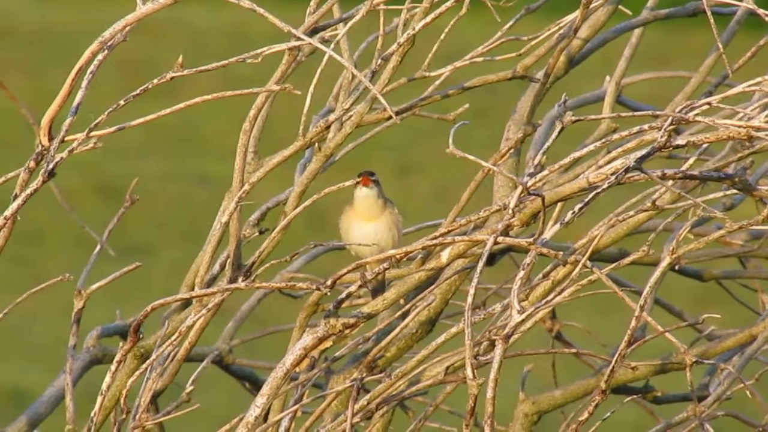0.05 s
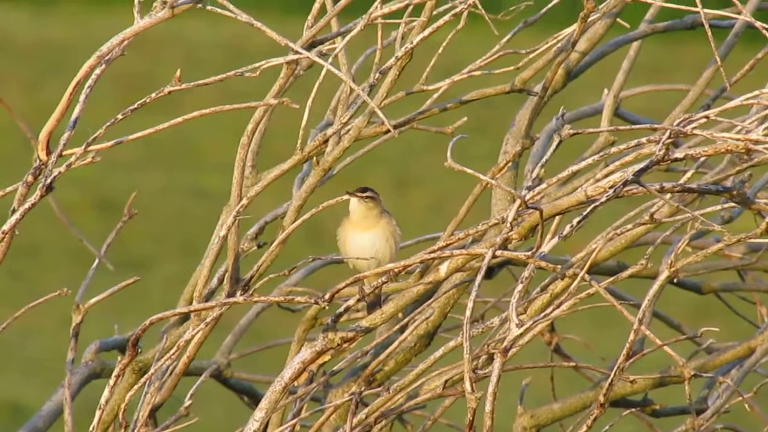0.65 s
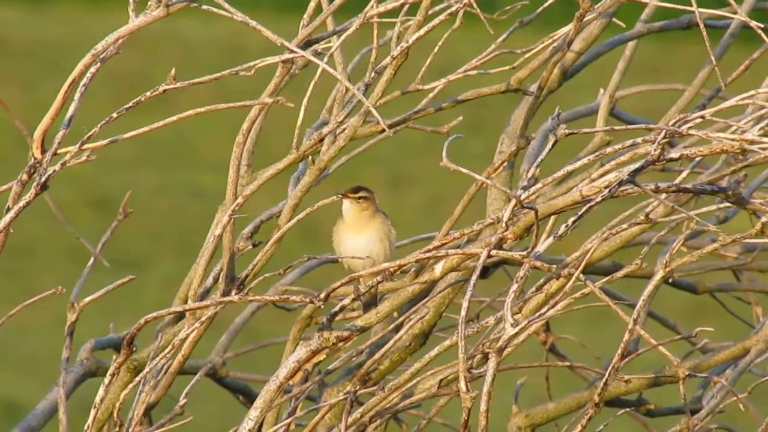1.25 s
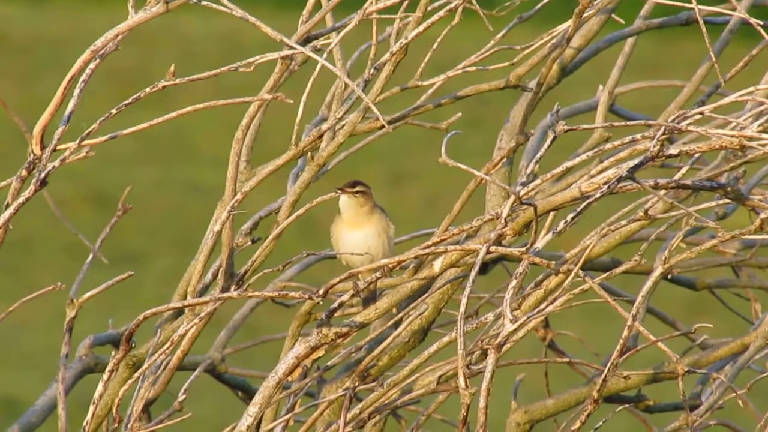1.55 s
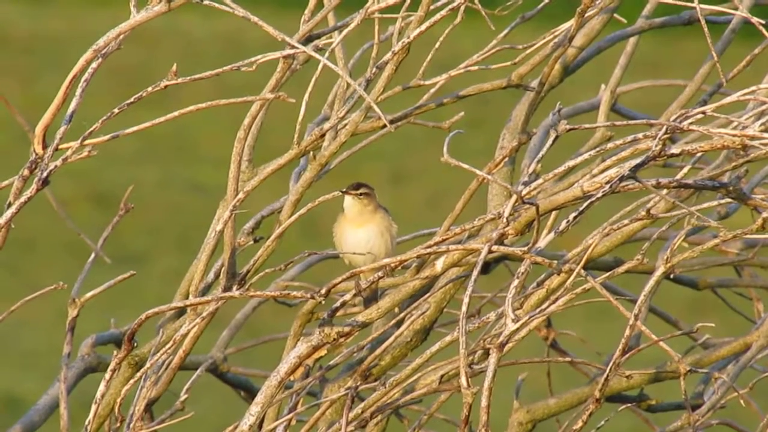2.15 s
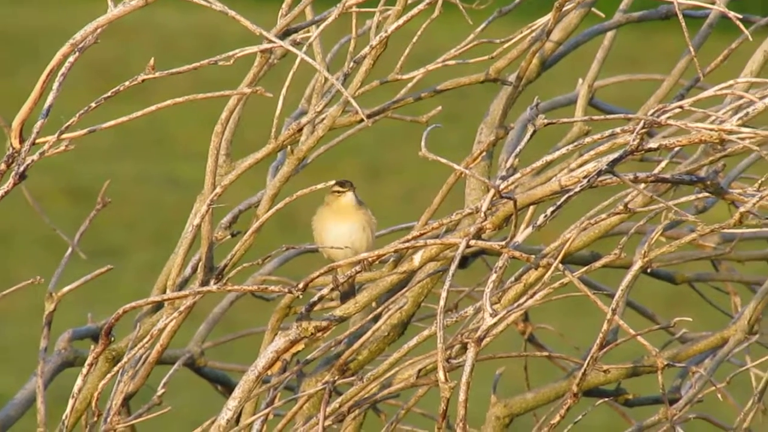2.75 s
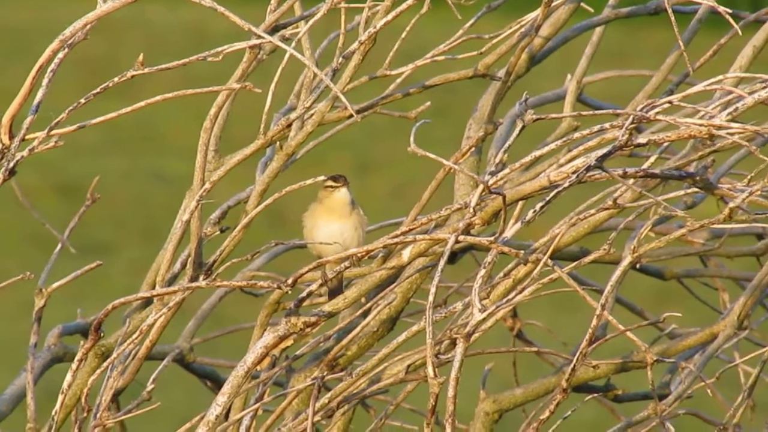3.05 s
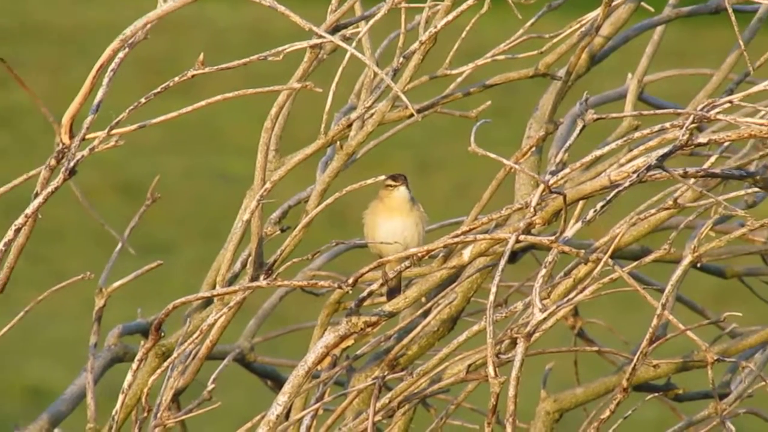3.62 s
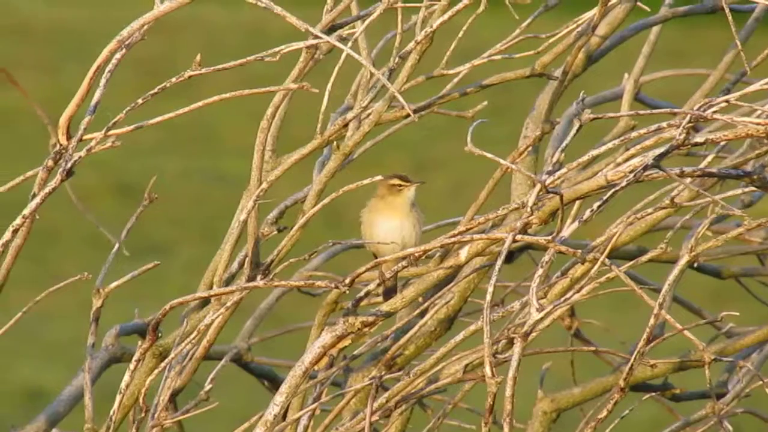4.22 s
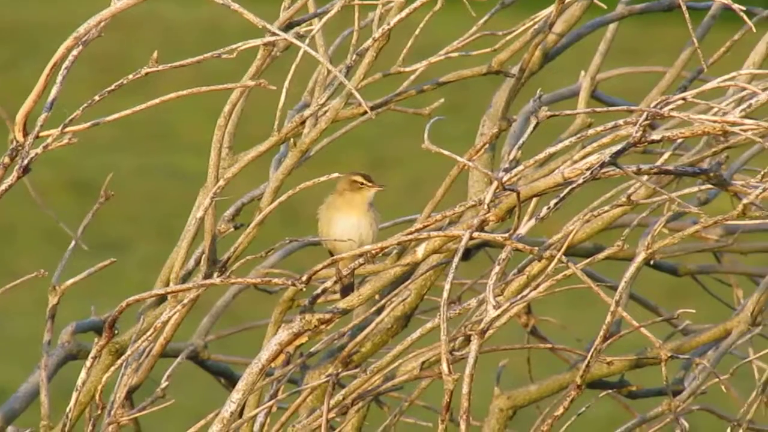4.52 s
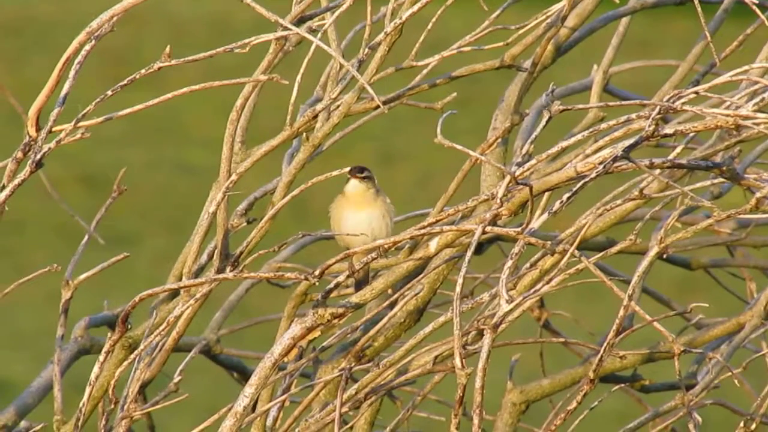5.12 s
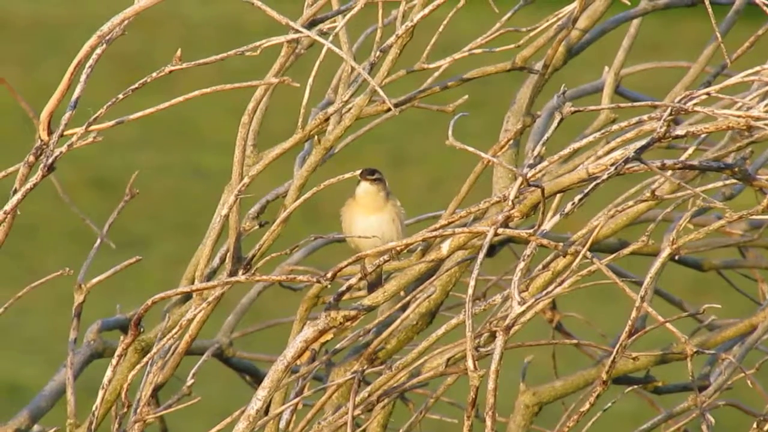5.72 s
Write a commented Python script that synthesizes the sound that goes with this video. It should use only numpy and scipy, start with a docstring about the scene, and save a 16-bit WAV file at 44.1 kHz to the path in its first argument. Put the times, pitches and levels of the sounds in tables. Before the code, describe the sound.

A nearby warbler sings rattling notes and high whistles outdoors, over gusty wind rumble and faint distant bird calls.

```python
"""A warbler chatters in dry branches, close in front of a stereo microphone. The membranes of its
syrinx pulse in harsh chips, are chopped by a slower vibration into nasal buzzes, or swing cleanly in
quick whistles, often two sounds at once from the two sides. Soft low whistles arch under its song.
Far off to the right a songbird slurs and rasps and something calls hoarsely. Over the hum of open
country, gusts push eddies against the microphone ports, mostly the right one."""
import sys
import numpy as np
from scipy import signal
from scipy.fft import rfft, irfft
from scipy.io import wavfile
from scipy.ndimage import uniform_filter1d

SR = 44100
rng = np.random.default_rng(int(sys.argv[2]) if len(sys.argv) > 2 else 0)


def dump_mix(stems):
    """Bounce the given channels to the path in sys.argv[1] as a 16-bit WAV at rate SR."""
    frames = np.atleast_2d(stems).T  # one column per channel
    limited = np.clip(frames, -1, 1)  # hard clip at full scale
    pcm = np.round(limited * 32767).astype(np.int16)
    wavfile.write(sys.argv[1], SR, pcm)


N = 258867
TIME = np.arange(N) / SR

# spectra of open air, wind rumble on a port and the breeze's slow pressure swings: f/Hz, level/dB
AIR_SPECTRUM = [(30, -29), (250, -9.5), (520, -3.5), (900, -10), (2000, -7), (3500, -14.5), (7000, -18),
                (15000, -32)]
RUMBLE_SPECTRUM = [(15, -16), (40, -6), (85, 0), (150, -5), (300, -15), (600, -37), (1500, -60)]
SWAY_SPECTRUM = [(15, -11), (35, 3), (60, -2), (120, -23), (400, -60)]
# breeze on the microphone between gusts: left level/dB, right level/dB
BREEZE_DB = (-61.5, -58)
# gusts on the microphone ports: t/s, length/s, left level/dB, right level/dB
GUSTS = [(0.123, 0.15, -70, -54.5), (0.858, 0.57, -56, -47), (1.8, 0.26, -62, -46.5),
         (2.184, .44, -39.5, -29), (2.755, 0.45, -54.5, -38), (3.286, 0.33, -36, -27.5),
         (3.873, 0.08, -49, -29), (4.495, 0.25, -52, -44), (4.775, 0.055, -37.5, -27.5),
         (4.976, .3, -41.5, -33.5), (5.317, 0.17, -36.5, -26.5), (5.523, .33, -27.5, -25)]
# single buffets on the right port: t/s, peak level/dB
BUFFETS = [(2.266, -14), (2.56, -20.5), (2.937, -28.5), (3.296, -16), (3.95, -23.5), (4.806, -20),
           (5.318, -16), (5.448, -12.5), (5.545, -11), (5.697, -14.5), (5.791, -8)]

# response of the warbler's throat: f/Hz, level/dB
THROAT = [(1200, -23.5), (2600, -4), (3600, -5.5), (4700, 2.5), (6400, 3.5), (7800, -2.5), (9500, -12),
          (12500, -20.5), (15500, -34)]
# rattles of three chips: t/s, spacing/s, f/Hz, brightness/(dB per octave), level/dB
RATTLES = [(.028, 0.02, 1582, 7.5, -29.5), (.125, .021, 1600, 8, -29), (2.937, 0.02, 1568, 4, -37),
           (3.038, .022, 1550, 1.5, -37), (3.146, .025, 1442, -1, -41), (3.758, .021, 1536, 5.5, -35.5),
           (3.859, 0.019, 1500, 1, -37.5), (4.63, 0.02, 1587, -0.5, -39.5), (4.761, 0.023, 1614, 1, -37.5),
           (4.879, .022, 1614, 5.5, -33.5), (5.002, .021, 1590, 11.5, -31.5), (5.137, .022, 1664, 5, -34),
           (5.284, .022, 1660, 4.5, -33.5), (5.402, .023, 1696, 2, -34), (5.516, .021, 1594, -2.5, -36),
           (5.626, .024, 1557, -1.5, -35)]
# hoarse calls in the distance: t/s, length/s, level/dB
CAWS = [(0.082, 0.58, -54), (1.651, 0.58, -58.5), (2.1, 0.61, -52.5), (3.155, 0.42, -60.5),
        (3.71, 0.39, -51), (4.333, 0.4, -49), (4.982, 0.57, -48.5)]
# slurs of the near warbler and the far songbird: t/s, length/s, first, middle and last f/Hz, level/dB
NEAR_SLURS = [(.18, .21, 7580, 7200, 6920, -47), (.55, 0.12, 7330, 7210, 6920, -45.5),
              (2.284, .04, 4720, 4770, 6100, -53.5), (2.516, 0.038, 4680, 4820, 5950, -56),
              (2.746, 0.038, 4610, 4780, 6000, -53), (3.555, 0.046, 5650, 6400, 5680, -59),
              (3.703, 0.049, 6430, 6150, 5900, -37.5), (4.67, 0.069, 6040, 5583, 6030, -25.5)]
FAR_SLURS = [(.8, 0.21, 2566, 2700, 2540, -50), (1.07, 0.22, 2227, 2460, 2345, -53),
             (4.18, .065, 3900, 3510, 3350, -58.5), (4.29, 0.03, 3590, 3260, 2850, -60.5),
             (4.41, 0.037, 3530, 3520, 3850, -58)]
# course of the arched syllable: t/s from its start, f/Hz, level/dB, rasp share 0-1
ARCH_SHAPE = [(0, 3900, -46, .3), (.009, 6750, -29, .1), (.022, 3200, -39.5, 1), (.042, 3150, -41, .9),
              (.052, 6190, -26.5, .05), (.064, 7950, -40.5, .1), (.083, 8750, -46, 0), (.093, 6570, -23, 0),
              (.1, 5430, -25.5, 0), (.111, 4720, -39, 0)]
# arched syllables: t/s, gain/dB, pitch factor, length factor, summit boost/dB
ARCHES = [(.219, -1.5, 1.035, 1, 2), (0.397, -2.5, 0.99, .99, 1.5), (.571, -2.5, 1.01, 1.003, 1.5),
          (3.274, -6, 1.03, 0.91, 11), (5.729, -6, 1.046, 1.02, 5)]
# pitch range over which the beak opens wide for that boost: low f/Hz, high f/Hz
SUMMIT_HZ = (7000, 8200)
# falling pips between phrases: t/s, length/s, f/Hz, share of pitch lost, level/dB
PIPS = [(0.768, .03, 5270, 0.24, -48.5), (1.606, .026, 4830, .12, -56), (2.694, 0.024, 4190, .07, -53.5),
        (3.804, 0.046, 4790, 0.24, -46), (3.908, 0.034, 5260, 0.064, -38),
        (4.121, 0.0216, 4760, 0.082, -39), (4.348, 0.031, 4680, 0.073, -32.5),
        (4.572, .032, 3870, 0.27, -43.5)]
# partials of the buzz, the nasal scold and the far rasp: multiple of the main line, level/dB
BUZZ_PARTIALS = [(.5, -15.5), (.7, -23), (.8, 1.5), (.9, -3), (1, 2.5), (1.1, -9), (1.2, -10.5), (1.3, -16),
                 (1.5, -21), (1.7, -31)]
NASAL_PARTIALS = [(.8, -8.5), (1, 0), (1.2, -8), (1.5, -9.5), (2, -14.5), (2.5, -39)]
RASP_PARTIALS = [(1, 3), (1.3, -8.5), (1.7, -5)]
# buzzes: t/s, length/s, top f/Hz, place of the top in the note 0-1, level/dB, tick count
BUZZES = [(0.786, .058, 7470, 0.58, -33, 1), (0.937, 0.086, 7205, 0.21, -30, 3),
          (1.145, .081, 7190, 0.033, -30.5, 2)]
# soft low arching whistles under the warbler's song: t/s, top f/Hz, level/dB
LOW_WHISTLES = [(0.806, 2940, -42.5), (.972, 2970, -45), (4.972, 2880, -50.5), (5.028, 2870, -48),
                (5.169, 2820, -52.5), (5.239, 2660, -48), (5.782, 2880, -51.5)]
# the warbler's scolding notes: t/s, length/s, top f/Hz, level/dB
SCOLDS = [(1.396, 0.045, 3340, -40), (1.437, 0.045, 2940, -41.5), (1.483, .05, 2726, -47.5)]
# the far songbird's hoarse notes: t/s, length/s, lowest f/Hz, level/dB
FAR_RASPS = [(2.58, 0.077, 2505, -57.5), (2.7, 0.05, 2490, -58.5), (2.818, 0.061, 2515, -56.5),
             (3.3, 0.079, 2470, -54), (3.44, 0.07, 2465, -52)]
# courses of the warbler's three learnt whistles: t/s from the start, f/Hz, level/dB
RISE_SHAPE = [(0, 4900, -39), (.007, 5170, -35), (.018, 5540, -26), (.032, 5890, -37.5),
              (.053, 7340, -42.5), (.095, 6570, -47), (.14, 6350, -35), (.153, 5910, -38.5)]
FALL_SHAPE = [(0, 4640, -39.5), (.008, 5350, -27), (.02, 6020, -41.5), (.042, 5390, -28), (.063, 4500, -28),
              (.075, 4080, -34.5), (.085, 3997, -50)]
THIN_SHAPE = [(0, 6780, -45), (.008, 7280, -32.5), (.018, 7610, -31), (.029, 7200, -27.5),
              (.041, 6890, -39), (.073, 7030, -29), (.107, 6970, -41), (.2, 6720, -31.5)]
# rising whistles: t/s, gain/dB, length factor
RISES = [(3.969, -1.3, .85), (4.174, -0.2, 1), (4.402, 3, .94)]


def amp(db):
    """Decibels to gain."""
    return 10 ** (np.asarray(db) / 20)


def unit(x):
    """Scales to rms 1."""
    return x / np.sqrt(np.mean(x ** 2) + 1e-20)


def gain_at(spectrum, hz):
    """Reads a spectrum on a log-frequency axis."""
    f, db = np.transpose(spectrum)
    return amp(np.interp(np.log(hz + 1), np.log(f), db))


def noise(spectrum, size):
    """Noise of rms 1 with the given spectrum."""
    gains = gain_at(spectrum, np.fft.rfftfreq(size, 1 / SR))
    return unit(irfft(rfft(rng.standard_normal(size)) * gains, size))


def waver(hz, size):
    """Smooth random motion of rms 1, up to about hz."""
    gains = np.exp(-(np.fft.rfftfreq(size, 1 / SR) / hz) ** 2)
    return unit(irfft(rfft(rng.standard_normal(size)) * gains, size))


def add(mix, s, sound):
    """Mixes a sound in at time s."""
    part = mix[max(round(s * SR), 0):][:len(sound)]
    part += sound[:len(part)]


def progress(length):
    """Runs from 0 to 1 over a note."""
    return np.linspace(0, 1, int(length * SR))


def swell(u, attack, release):
    """Rise, hold and fall; attack and release are shares of the note."""
    return np.sin(np.pi / 2 * np.clip(np.minimum(u / attack, (1 - u) / release), 0, 1)) ** 2


def faded(x, samples=60):
    """Softens both ends of a sound."""
    k = np.arange(len(x))
    return x * np.minimum(np.minimum(k, k[::-1]) / samples, 1)


def gesture(shape, stretch, inertia_samples=130):
    """Control curves of one note, their corners rounded by the inertia of the muscles."""
    s, *columns = np.transpose(shape)
    s = np.sort(s) * stretch
    t = np.arange(s[0], s[-1], 1 / SR)
    return [uniform_filter1d(np.interp(t, s, column), inertia_samples) for column in columns]


def phase_of(hz, jitter, jitter_hz):
    """Phase of a membrane whose pitch trembles."""
    return 2 * np.pi * np.cumsum(hz * (1 + jitter * waver(jitter_hz, len(hz)))) / SR


def air(hum_db=-56, width=0.83, rustle_db=-63):
    """The hum of open country all around, and a thin rustle of dry stalks in one gust."""
    centre = noise(AIR_SPECTRUM, N)
    sides = np.array([noise(AIR_SPECTRUM, N) for _ in range(2)])
    stalks = np.array([noise([(4000, -8.5), (8500, -15), (12000, -6), (15500, -25)], N)
                       for _ in range(2)])
    gust = np.exp(-((TIME - 3.35) / 0.76) ** 2)
    return amp(hum_db) * unit(centre + width * sides) + amp(rustle_db) * stalks * gust


def pressure_db(side, attack_s=0.022, release_s=0.063):
    """Wind pressure on one port: gusts that build, hold and ease off over a light breeze."""
    power = amp(BREEZE_DB[side]) ** 2
    for s, length, *ports_db in GUSTS:
        outside = np.maximum(s - TIME, 0) / attack_s + np.maximum(TIME - s - length, 0) / release_s
        power = power + (amp(ports_db[side]) * np.exp(-outside)) ** 2
    return 10 * np.log10(power)


def eddy(width_s):
    """An eddy passing the port sucks, then pushes."""
    u = np.arange(-5 * width_s, 5 * width_s, 1 / SR) / width_s
    return u * np.exp((1 - u ** 2) / 2)


def wind(full_gust_db=-26, growth=1.65, lumps_db=6, eddies_db=-0.5, flurry_db=5, narrow_db=-14,
         sway_db=-57, hits_per_s=90):
    """Each microphone port rumbles on its own; eddies knock on it, outgrowing the rumble in a gust."""
    out = np.zeros((2, N))
    for side, port in enumerate(out):
        db = pressure_db(side)
        port += amp(db) * unit(noise(RUMBLE_SPECTRUM, N) * amp(lumps_db * np.tanh(waver(31, N))))
        port += amp(sway_db) * noise(SWAY_SPECTRUM, N)
        knocks, flurry = np.zeros(N), np.tanh(waver(30, N))
        for smallness, width_s in zip(np.linspace(0, 1, 5), np.geomspace(.0013, .0003, 5)):
            hits = rng.standard_normal(N) * (rng.random(N) < hits_per_s / SR)
            gain = amp(narrow_db * smallness + flurry_db * flurry * (1 + smallness))
            knocks += gain * signal.oaconvolve(hits, eddy(width_s), "same")
        port += amp(eddies_db + full_gust_db + growth * (db - full_gust_db)) * unit(knocks)
    for s, db in BUFFETS:
        for k in range(3):  # each big eddy sheds weaker ones behind it
            lag_s = k * rng.uniform(.003, .008)
            add(out[1], s + lag_s, amp(db - 7 * k) * eddy(rng.uniform(.00033, .00065)))
    return out


def chip(length, pitch_hz, bright, sag, half_db=-9, hiss_db=-11):
    """Strong and weak pulses through the throat; the pitch arches, then sags as the pressure goes."""
    u = progress(length)
    hz = pitch_hz * (1 + .02 * rng.standard_normal()) * (1 - sag * (u - .3) ** 2)
    k = np.arange(2, 24)[:, None] / 2  # harmonics and the half lines between them
    throat = [(f, db + bright * np.log2(min(f, 8500) / 6000)) for f, db in THROAT]
    half_lines = np.where(k % 1 > 0, amp(half_db) * 2 * u, 1)  # the pulses grow uneven
    lines = gain_at(throat, k * hz) * half_lines * (k * hz < SR / 2)
    phase = phase_of(hz, jitter=.024, jitter_hz=800)
    voice = (lines * np.cos(k * phase + rng.uniform(0, np.pi, k.shape))).sum(0)
    hiss = amp(hiss_db) * noise(throat, len(u))
    return unit(unit(voice) + hiss) * np.abs(np.sin(np.pi * u)) ** 1.55


def rattles(dulling=1.8, first_db=-3, first_sag=0.28, later_sag=0.504):
    """The warbler's chips come in quick threes; the later ones are louder, duller and sag more."""
    out = np.zeros(N)
    for s, spacing, hz, bright, db in RATTLES:
        length = .88 * spacing
        for k, (gain_db, sag) in enumerate([(first_db, first_sag), (0, later_sag), (0, later_sag)]):
            note = chip(length, hz, bright - dulling * k, sag)
            add(out, s + k * spacing - length / 2, amp(db + gain_db) * note)
    return out


def caws(resonances_hz=(1430, 1860), width_hz=170, opening=.16):
    """A distant caller: hoarse noise in two throat resonances that rise as the beak opens."""
    out = np.zeros(N)
    for s, length, db in CAWS:
        u = progress(length)
        phase_per_hz = 2 * np.pi * np.cumsum(1 + opening * (u - .5)) / SR
        call = 0
        for hz in resonances_hz:
            band = waver(width_hz, len(u)) + 1j * waver(width_hz, len(u))
            call += (band * np.exp(1j * hz * phase_per_hz)).real
        add(out, s, amp(db) * unit(call) * np.sqrt(np.abs(np.sin(np.pi * u))))
    return out


def tone(hz, octave_db=-47):
    """A nearly pure whistle that trembles a little in pitch and level."""
    phase = phase_of(hz, jitter=.005, jitter_hz=400)
    flutter = amp(.7 * waver(120, len(hz)))
    return np.sqrt(2) * flutter * (np.sin(phase) + amp(octave_db) * np.sin(2 * phase))


def slurs(notes, attack, release):
    """Whistles that bend smoothly from a first pitch through a middle one to the last."""
    out = np.zeros(N)
    for s, length, *pitches, db in notes:
        u = progress(length)
        hz = np.polyval(np.polyfit([0, .5, 1], pitches, 2), u)
        add(out, s, amp(db) * swell(u, attack, release) * tone(hz))
    return out


def arches(octave_db=-34, hiss_db=-2):
    """A close whistle that dives, breaks into its octave and a rasp, then soars and drops."""
    out = np.zeros(N)
    for s, gain_db, pitch, stretch, summit_db in ARCHES:
        hz, db, rasp = gesture(ARCH_SHAPE, stretch)
        rasp = np.clip(rasp, 0, 1)
        db = db + np.interp(hz, SUMMIT_HZ, [0, summit_db])
        phase = phase_of(hz * pitch, jitter=0.0086, jitter_hz=700)
        broken = gain_at(THROAT, 2 * hz) * np.sin(2 * phase) + amp(hiss_db) * noise(THROAT, len(hz))
        clean = np.sqrt(2) * (np.sin(phase) + amp(octave_db) * np.sin(2 * phase))
        voice = np.sqrt(1 - rasp) * clean + np.sqrt(rasp) * broken
        add(out, s, faded(amp(db + gain_db) * voice))
    return out


def pips():
    """Short warbler notes that start quickly and slide down as they fade."""
    out = np.zeros(N)
    for s, length, hz, sag, db in PIPS:
        u = progress(length)
        add(out, s, amp(db) * swell(u, attack=0.22, release=0.5) * tone(hz * (1 - sag * u)))
    return out


def rough_voice(partials, hz, hiss_db, jitter, shimmer=0.37):
    """A slow second vibration chops the tone into unsteady side lines; air hisses through in puffs."""
    phase = phase_of(hz, jitter, jitter_hz=700)
    voice = 0
    for multiple, db in partials:
        gain = amp(db) * (1 + shimmer * waver(150, len(hz)))
        voice += gain * np.cos(multiple * phase + rng.uniform(0, np.pi))
    puffs = unit(np.diff(noise(THROAT, len(hz) + 1)) * (1 + np.cos(phase / 10)))
    return unit(voice) + amp(hiss_db) * puffs


def buzzes(bend=.14, gap_s=0.0032, tick_every_s=0.027, tick_s=0.0184, tick_hz=6700, tick_db=-30):
    """Each close buzz swells and arches in pitch, then stutters into falling ticks that die away."""
    out = np.zeros(N)
    for s, length, top_hz, top_at, db, ticks in BUZZES:
        u = progress(length)
        hz = top_hz * (1 - bend * np.abs(u - top_at) ** 1.5)
        voice = rough_voice(BUZZ_PARTIALS, hz, hiss_db=-11, jitter=.007)
        add(out, s, amp(db) * swell(u, attack=0.36, release=0.088) * voice)
        u = progress(tick_s)
        for k in range(ticks):
            tick = rough_voice(BUZZ_PARTIALS, tick_hz * (1 - .16 * u), hiss_db=-7, jitter=0.014)
            envelope = amp(tick_db - 5 * k ** 2) * swell(u, attack=0.34, release=0.6)
            add(out, s + length + gap_s + k * tick_every_s, envelope * tick)
    return out


def low_whistles(length_s=0.0513, arch=0.182, lean=0.71):
    """Soft low whistles that arch near 2.9 kHz and drop, under the warbler's song."""
    out, u = np.zeros(N), progress(length_s)
    for s, top_hz, db in LOW_WHISTLES:
        hz = top_hz * (1 - arch * (2 * u ** lean - 1) ** 2)
        add(out, s, amp(db) * swell(u, attack=0.34, release=0.36) * tone(hz))
    return out


def chucks(lone_s=1.381, start_s=1.659, every_s=.0875, pairs=5, lag_s=0.027,
           length_s=.019, hz=1299, db=-36):
    """Low warbler chips: one alone, then evenly paced pairs, the second chip softer and duller."""
    out = np.zeros(N)
    add(out, lone_s - length_s / 2, amp(-2.5) * chip(length_s, hz, bright=-3.5, sag=0.3))
    for s in start_s + every_s * np.arange(pairs) - length_s / 2:
        add(out, s, chip(length_s, hz, bright=-3.5, sag=0.3))
        add(out, s + lag_s, amp(-3.5) * chip(length_s, hz, bright=-6.5, sag=0.51))
    return amp(db) * out


def scolds(arch=0.46, lean=1.3):
    """Close nasal notes whose pitch arches with the pressure."""
    out = np.zeros(N)
    for s, length, top_hz, db in SCOLDS:
        u = progress(length)
        hz = top_hz * (1 - arch * (2 * u ** lean - 1) ** 2)
        voice = rough_voice(NASAL_PARTIALS, hz, hiss_db=-14.5, jitter=0.02)
        add(out, s, amp(db) * swell(u, attack=0.29, release=0.17) * voice)
    return out


def far_rasps(scoop=0.143):
    """The far songbird's hoarse notes dip in pitch and come back up."""
    out = np.zeros(N)
    for s, length, low_hz, db in FAR_RASPS:
        u = progress(length)
        hz = low_hz * (1 + scoop * (2 * u - 1) ** 2)
        voice = rough_voice(RASP_PARTIALS, hz, hiss_db=-14, jitter=0.032)
        add(out, s, amp(db) * swell(u, attack=0.27, release=0.17) * voice)
    return out


def whistle(shape, stretch=1):
    """The syrinx follows one learnt course of pitch and level."""
    hz, db = gesture(shape, stretch)
    return faded(amp(db) * tone(hz))


def whistles(falls=7, falls_start_s=4.778, every_s=.1143, step_db=-0.64, thin_s=5.594):
    """The warbler ends on three rising whistles, a fading series of falling ones and a thin note."""
    out = np.zeros(N)
    for s, db, stretch in RISES:
        add(out, s, amp(db) * whistle(RISE_SHAPE, stretch))
    for k in range(falls):
        stretch = 1 + 0.021 * rng.standard_normal()
        add(out, falls_start_s + k * every_s, amp(0.2 + k * step_db) * whistle(FALL_SHAPE, stretch))
    add(out, thin_s, whistle(THIN_SHAPE))
    return out


def outdoors(x, twigs_db, field_db, twigs_t60=0.065, field_t60=0.52):
    """At the microphone: direct sound, quick scatter from branches and ground, a tail from the field."""
    t = np.arange(SR // 2) / SR
    out = np.array([x, x])
    for db, t60 in ((twigs_db, twigs_t60), (field_db, field_t60)):
        echoes = rng.standard_normal((2, len(t))) * (rng.random((2, len(t))) < .06)
        echoes *= (t > .002) * amp(-60 * t / t60)
        echoes /= np.linalg.norm(echoes, axis=1, keepdims=True)
        out = out + amp(db) * signal.fftconvolve(x[None], echoes, axes=1)[:, :N]
    return out


def pan(stereo, right_db):
    """Raises the right channel by right_db and lowers the left as much."""
    return stereo * amp(np.array([[-1], [1]]) * right_db)


def scene():
    """The warbler close in front, the other birds far off to the right, wind on the microphone."""
    harsh = rattles() + chucks() + buzzes() + scolds() + arches()
    clear = whistles() + pips() + slurs(NEAR_SLURS, attack=0.097, release=.3)
    warbler = outdoors(harsh + clear, twigs_db=-4.5, field_db=-19.5)
    far_song = slurs(FAR_SLURS, attack=0.12, release=0.18) + far_rasps()
    soft_notes = outdoors(far_song + low_whistles(), twigs_db=-7.5, field_db=-6.0)
    caller = outdoors(caws(), twigs_db=-14.0, field_db=-11.5)
    head_turn_db = -0.5 + np.clip(TIME - 3, 0, 1)  # the warbler turns its head to the right
    return pan(warbler, head_turn_db) + pan(soft_notes, 3.5) + pan(caller, 0.8) + air() + wind()


def record(dry, edge_hz=15750):
    """The recorder's band limit, with both ends softened."""
    soft_ends = np.array([faded(channel) for channel in dry])
    lowpass = signal.firwin(511, edge_hz, window=("kaiser", 9), fs=SR)
    return signal.oaconvolve(soft_ends, lowpass[None], "same")


dry = scene()
out = record(dry)
dump_mix(out)
```